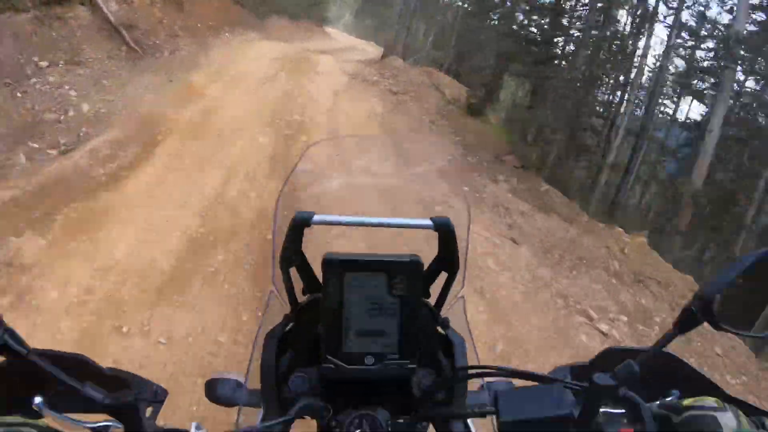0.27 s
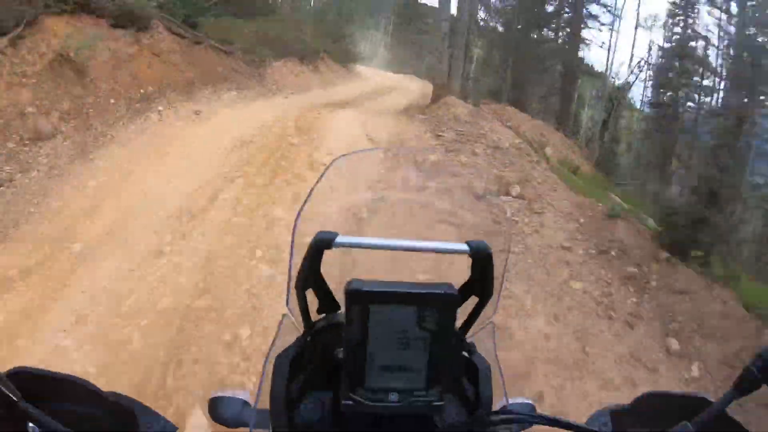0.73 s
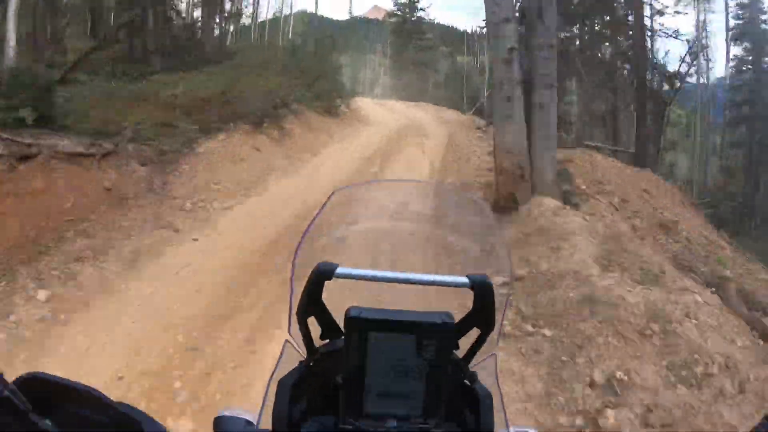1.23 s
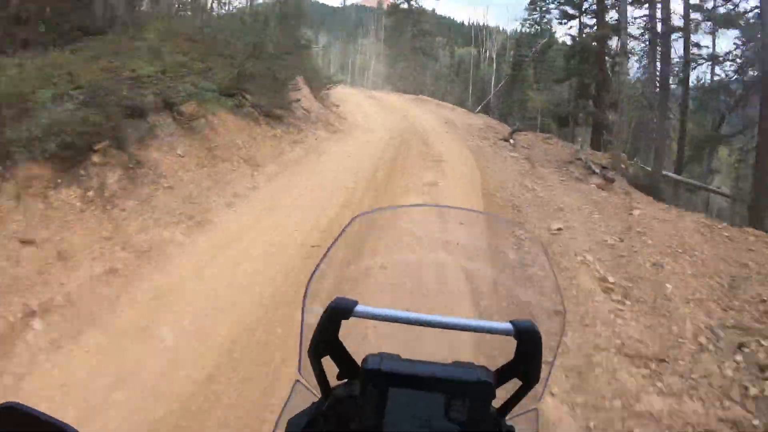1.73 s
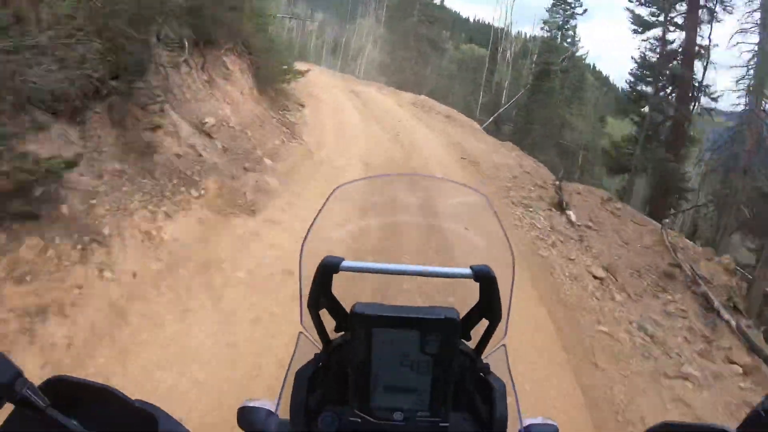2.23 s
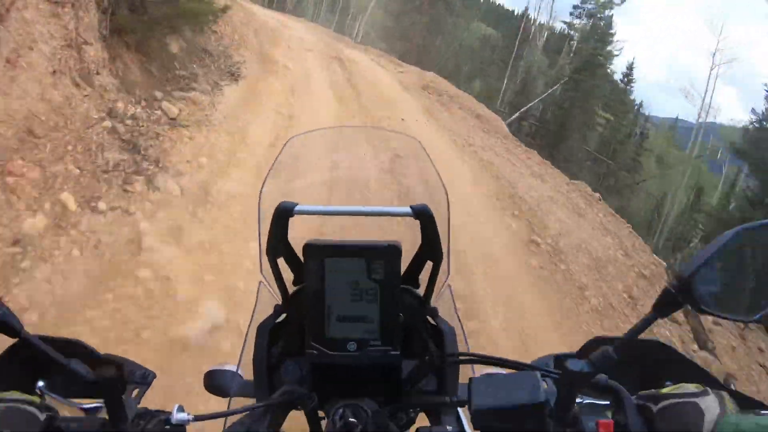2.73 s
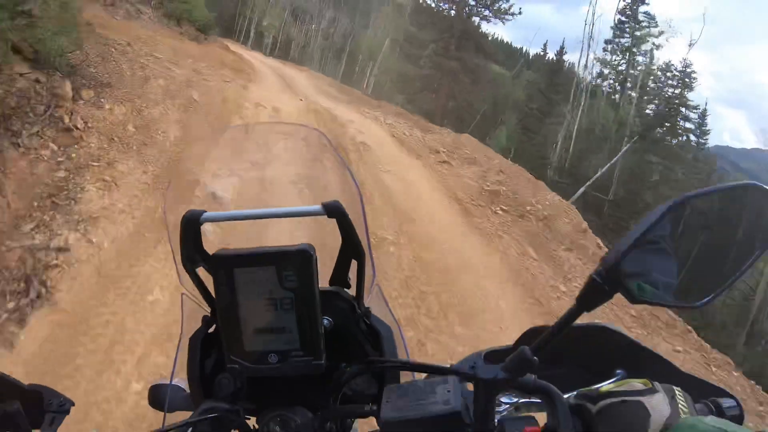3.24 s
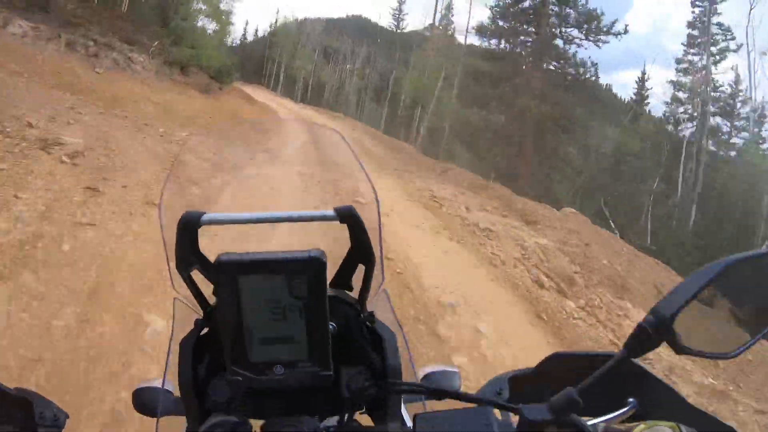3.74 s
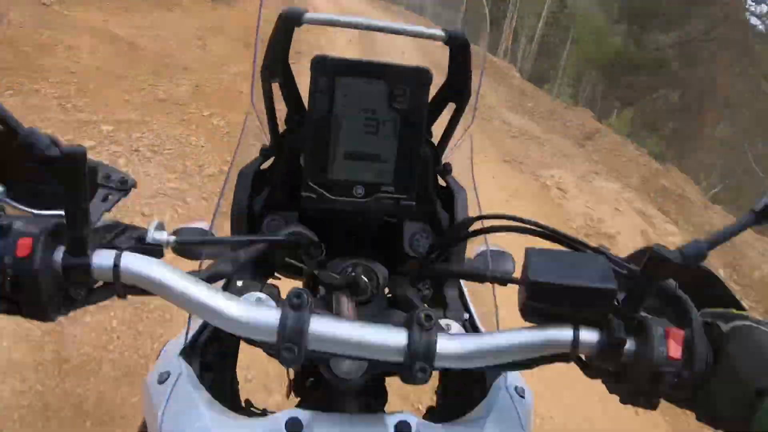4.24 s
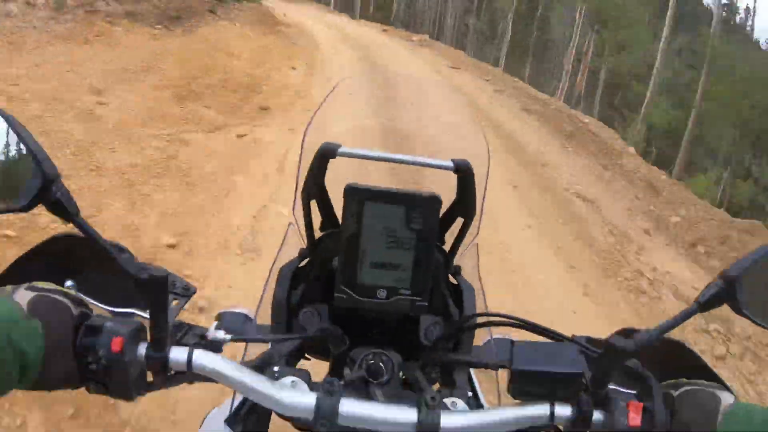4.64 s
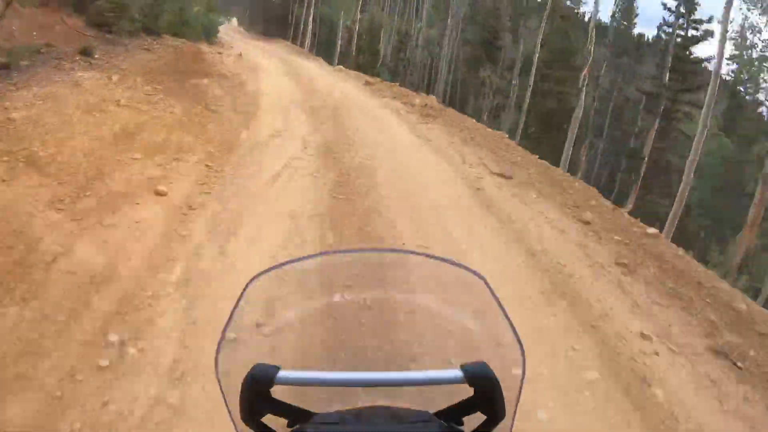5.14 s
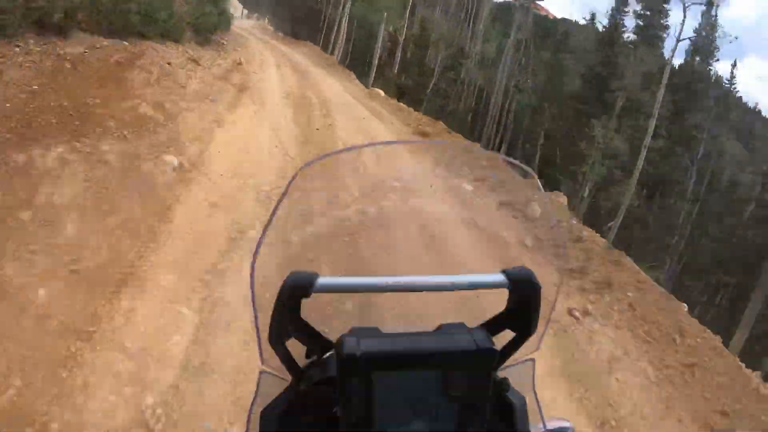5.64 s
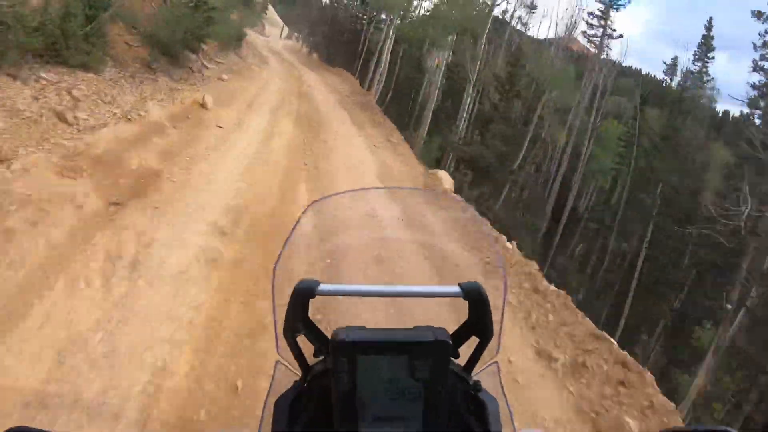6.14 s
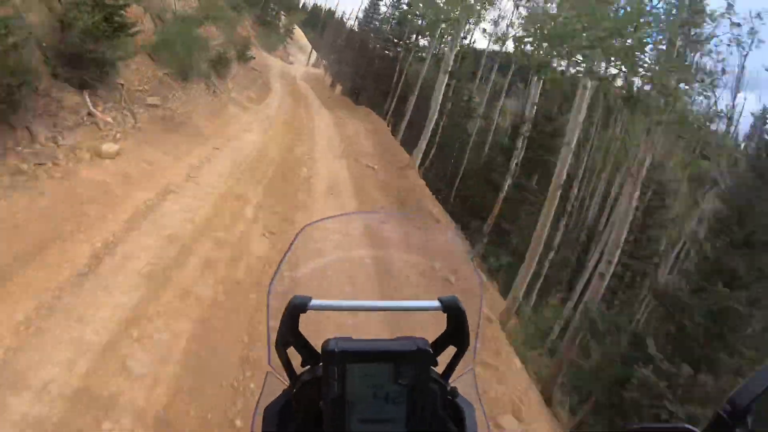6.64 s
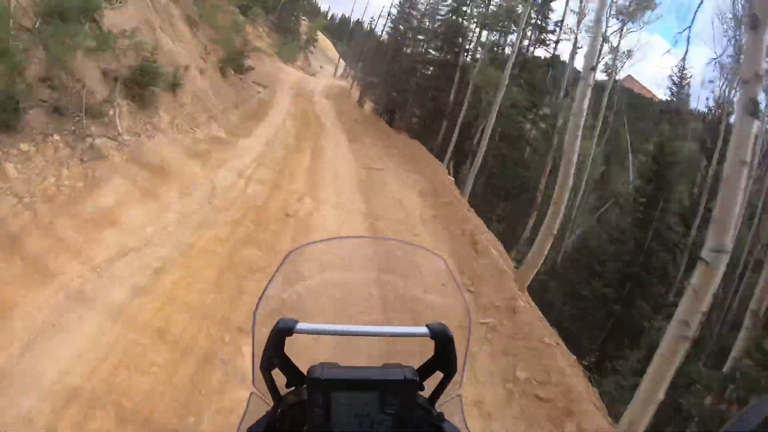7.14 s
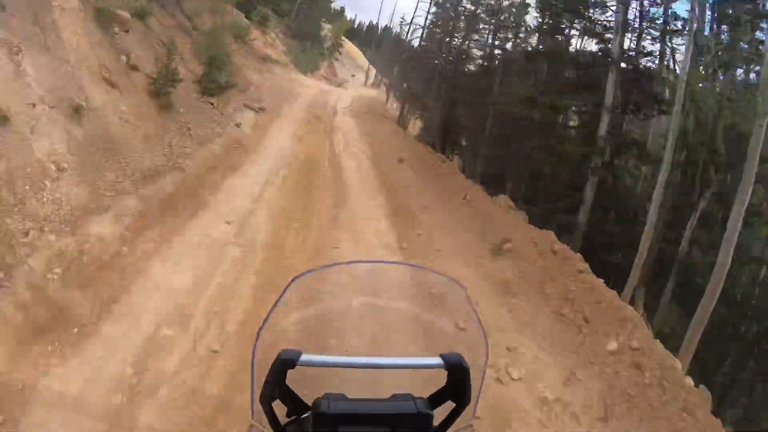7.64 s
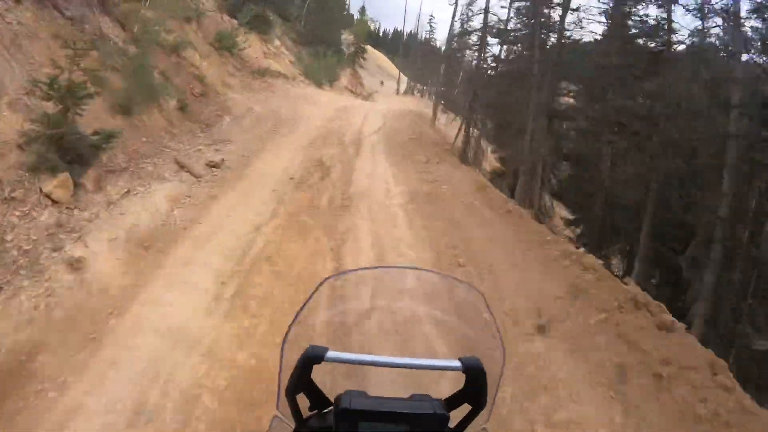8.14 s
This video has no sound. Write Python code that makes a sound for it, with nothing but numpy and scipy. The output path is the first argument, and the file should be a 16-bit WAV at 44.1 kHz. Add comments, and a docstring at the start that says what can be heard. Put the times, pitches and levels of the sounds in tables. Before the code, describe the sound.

Close on the rider's chest, a twin-cylinder motorcycle throbs and growls along a mountain gravel road. Revs flutter and flare, then ease to a softer, lower note with intake growl. Midway the engine races as the wheel slips, and a cluster of heavy thuds and knocks shakes the bike. It drops quiet, then pulls again, climbing steadily. Gravel crunches, stones tick and clank, low wind rumbles.

```python
"""A parallel-twin motorcycle climbs a gravel road, heard from the rider's chest as the throttle opens and eases.
The exhaust throbs in engine orders through a ringing silencer; intake gulps growl and whistle in the airbox.
Knocks and noise ring the crankcase and gear tones glide with the engine.
Showers of clicks make the gravel, struck resonances the stones and jolts; shaped noise makes the wind."""
import sys
import numpy as np
from scipy import signal
from scipy.fft import rfft, irfft, next_fast_len
from scipy.io import wavfile
from scipy.ndimage import uniform_filter1d, minimum_filter1d

SR = 44100
rng = np.random.default_rng(int(sys.argv[2]) if len(sys.argv) > 2 else 0)


def file_out(sig):
    """Save sig as 16-bit WAV at sys.argv[1]."""
    # one column per channel
    cols = np.atleast_2d(sig).T
    # limit, then scale
    lim = np.clip(cols, -1, 1)
    pcm = np.round(lim * 32767).astype(np.int16)
    wavfile.write(sys.argv[1], SR, pcm)


N = 369558
TIME = np.arange(N) / SR

SECOND_FIRING = 270 / 720  # share of the four-stroke cycle
LOUDEST_SPEED = 34.6  # cycles per s; above this speed the revs make the silencer and third order no louder

# Resonances of the crankcase: pitch_hz [Hz], width_hz [Hz], level_db [dB, relative]
CRANKCASE_MODES = [(1010, 50, -8), (1135, 80, 3.5), (1245, 45, -1), (1410, 60, -2), (1585, 130, 3),
                   (1860, 70, 1), (2020, 70, -2), (2370, 120, -6), (2850, 110, -3)]


def from_db(db):
    """Decibels to gain."""
    return 10 ** (np.asarray(db) / 20)


def rms_one(x):
    """Scale to unit power."""
    return x / np.sqrt(np.mean(x ** 2) + 1e-20)


def control_curve(rows):
    """Join (time, value) points by straight lines, a value at every sample."""
    times_s, values = np.transpose(rows)
    return np.interp(TIME, times_s, values)


def swing(control):
    """How far a control stands above its mean."""
    return control - control.mean()


def swell(centre_s, half_length_s):
    """A smooth rise and fall around a moment, down to 1/e at the half length."""
    return np.exp(-((TIME - centre_s) / half_length_s) ** 2)


def drift(rate_hz):
    """Slow random wandering with unit power, quicker at a higher rate."""
    step = 40  # samples between the points of the slow curve
    r = np.exp(-2 * np.pi * rate_hz * step / SR)
    chance = rng.standard_normal(N // step + 2002)
    # the first 2000 points let the filter settle
    slow = signal.lfilter([1], [1, -2 * r, r * r], chance)[2000:]
    return np.interp(np.arange(N) / step, np.arange(len(slow)), rms_one(slow))


def colour(x, spectrum):
    """Give a sound a smooth spectrum with falling skirts; unit power."""
    hz, db = np.transpose(spectrum)
    size = next_fast_len(N + SR // 2)
    bins = np.maximum(np.fft.rfftfreq(size, 1 / SR), 1)
    gain = from_db(np.interp(np.log(bins), np.log(hz), db))
    low_skirt = np.minimum(1, bins / hz[0]) ** 2
    high_skirt = np.minimum(1, hz[-1] / bins) ** 2
    return rms_one(irfft(rfft(x, size) * gain * low_skirt * high_skirt, size)[:N])


def cut(x, hz, kind, order=2):
    """Low- or high-pass."""
    return signal.sosfilt(signal.butter(order, hz, kind, fs=SR, output="sos"), x + 1e-18)


def resonate(x, modes):
    """Parallel resonances of alternating sign; a narrower width rings longer."""
    out = 0
    for k, (hz, width_hz, db) in enumerate(modes):
        r = np.exp(-np.pi * width_hz / SR)
        poles = [1, -2 * r * np.cos(2 * np.pi * hz / SR), r * r]
        gain = (-1) ** k * from_db(db) * (1 - r * r) / 2
        out = out + gain * signal.lfilter([1, 0, -1], poles, x + 1e-18)
    return out


def peak_one(modes):
    """Gain that makes a unit click ring with height 1."""
    return 1 / np.abs(resonate(signal.unit_impulse(SR // 20), modes)).max()


def duct(x, trips_s, reflection):
    """Waves bounce along the ducts, so that each pulse is drawn out but keeps its spectrum."""
    size = next_fast_len(N + SR // 2)
    spectrum = rfft(x, size)
    for trip_s in trips_s:
        delay = np.exp(-2j * np.pi * trip_s * np.fft.rfftfreq(size, 1 / SR))
        spectrum = spectrum * (delay - reflection) / (1 - reflection * delay)
    return irfft(spectrum, size)[:N]


def strokes(cycles, second_db, rough_db, jitter_s):
    """One pulse per cylinder and cycle, with random spread of strength and timing."""
    out = np.zeros(N)
    count = np.arange(int(cycles[-1]))
    for offset, db in ((0, 0), (SECOND_FIRING, second_db)):
        timing, strength = rng.standard_normal((2, len(count)))
        at = (np.interp(count + offset, cycles, TIME) + jitter_s * timing) * SR
        out[np.clip(at.astype(int), 0, N - 1)] = from_db(db + rough_db * strength)
    return out


def puffs(pulses, decay_s):
    """Each pulse lets out a short burst of noise."""
    envelope = signal.lfilter([1], [1, -np.exp(-1 / (decay_s * SR))], pulses + 1e-18)
    return envelope * rng.standard_normal(N)


def grains(per_s, spread_db):
    """Random clicks of either sign; a wider spread makes a few of them larger."""
    sizes = from_db(spread_db * np.minimum(rng.exponential(1, N), 5)) * rng.choice([-1, 1], N)
    return sizes * (rng.random(N) < per_s / SR)


def blows(times_s, levels_db):
    """A click at each time."""
    out = np.zeros(N)
    out[(np.asarray(times_s) * SR).astype(int)] = from_db(levels_db)
    return out


def engine(speed, load_db, intake_db, rattle_db):
    """Speed sets the pitch of every part; speed and load drive the silencer, and the gears follow the clatter."""
    # the rough road tugs at the crank
    cycles = np.cumsum(speed * (1 + .003 * drift(14))) / SR
    revs = swing(np.minimum(speed, LOUDEST_SPEED))
    # the silencer answers to the load averaged over 0.25 s
    pull_db = uniform_filter1d(swing(load_db), int(.25 * SR))
    silencer_db = -37.5 + .5 * pull_db + 1.67 * revs
    # a floor keeps the silencer humming on a shut throttle
    silencer_db = np.maximum(silencer_db, -41) + drift(12)
    exhaust = exhaust_throb(cycles, speed, load_db, intake_db) + silencer(cycles, silencer_db)
    intake = airbox(cycles, speed, intake_db) + whistle(cycles)
    return exhaust + intake + clatter(cycles, rattle_db) + gears(cycles, rattle_db - 11)


def exhaust_throb(cycles, speed, load_db, intake_db):
    """The lowest engine orders leave the tailpipe as nearly pure tones; the third yields to load and intake."""
    # Set moments when an order booms on a resonance of the pipes:
    # centre_s [s], order [multiple of the cycle rate], half_length_s [s], level_db [dB]
    boom_moments = [(0.497, 6, 0.016, -15.5), (1.306, 9, 0.059, -26), (1.632, 6, 0.075, -20),
                    (2.004, 9, 0.18, -34), (1.754, 3, 0.36, -34), (2.348, 3, 0.24, -22.5),
                    (2.675, 8, 0.21, -30), (3.437, 5, 0.17, -24.5), (3.466, 6, 0.18, -24.5),
                    (4.153, 6, 0.046, -27), (4.33, 5, 0.12, -23), (4.28, 8, 0.037, -26),
                    (4.38, 14, 0.044, -31), (4.905, 16, 0.052, -46), (4.93, 3, 0.093, -37),
                    (5.17, 10, 0.073, -32), (5.2, 12, 0.091, -38), (5.24, 9, 0.064, -46),
                    (6.052, 6, 0.099, -20.5), (6.864, 6, 0.15, -33), (7.182, 6, 0.1, -22.5),
                    (7.8, 6, 0.26, -28), (8.245, 6, 0.14, -26.5)]
    first_db = -47.5 + .74 * swing(load_db)
    revs_db = 2.2 * swing(np.minimum(speed, LOUDEST_SPEED))  # dB per cycle per s
    third_db = -33 + revs_db - .17 * swing(intake_db) - .044 * swing(load_db)
    sixth_db = -38 + .11 * swing(intake_db)
    out = np.zeros(N)
    for order, db in ((1, first_db), (2, load_db), (3, third_db), (6, sixth_db)):
        out += from_db(db + .5 * drift(19)) * np.cos(2 * np.pi * order * cycles)
    for centre_s, order, half_length_s, db in boom_moments:
        out += from_db(db) * swell(centre_s, half_length_s) * np.cos(2 * np.pi * order * cycles)
    return np.sqrt(2) * out


def silencer(cycles, level_db):
    """Both firings ring the silencer, with a little gas noise; its overtones glide together with the engine."""
    # Resonances: pitch_hz [Hz], width_hz [Hz], level_db [dB, relative]
    silencer_modes = [(292, 8.7, -8), (420, 18, 0), (480.7, 24.6, 13.5), (659, 14, -6.5), (1050, 120, -17)]
    # Tailpipe overtones: order [multiple of the cycle rate], level_db [dB, relative to the silencer]
    overtone_levels = [(8, -7), (9, -8), (11, -9), (12, -11), (13, -5), (16, -17), (17, -16), (18, -17)]
    pulses = strokes(cycles, second_db=-1.5, rough_db=.9, jitter_s=.00005)
    gas = rms_one(pulses) + .1 * rms_one(puffs(pulses, decay_s=.008))
    ringing = cut(resonate(gas, silencer_modes), 353, "high", order=4)
    ringing = cut(ringing, 1400, "low", order=4)
    ringing = rms_one(duct(ringing, trips_s=[.0058], reflection=.63))
    overtones = np.zeros(N)
    for order, db in overtone_levels:
        phase = 2 * np.pi * order * cycles + drift(.5)
        overtones += from_db(db + .8 * drift(3)) * np.sin(phase)
    return from_db(level_db) * (ringing + np.sqrt(2) * overtones)


def airbox(cycles, speed, level_db):
    """Intake gulps boom in the airbox, one throat louder; turbulence roughens them as the revs rise."""
    # Resonances: pitch_hz [Hz], width_hz [Hz], level_db [dB, relative]
    airbox_modes = [(153, 17, -22), (262.8, 59.3, 7), (337, 114, 3), (458.7, 33, 0), (566, 69, -12.5),
                    (1012, 12, -13)]
    pulses = strokes(cycles, second_db=-10, rough_db=.8, jitter_s=.00005)
    # share at mean speed .24, growing 1.3 dB per cycle per s
    turbulence = np.minimum(.24 * from_db(1.3 * swing(speed)), 1)
    air = rms_one(pulses) + turbulence * rms_one(puffs(pulses, decay_s=.069))
    air = air / np.hypot(1, turbulence)
    ringing = cut(resonate(air, airbox_modes), 158, "high", order=6)
    ringing = cut(ringing, 1400, "low", order=4)
    return from_db(level_db) * rms_one(duct(ringing, trips_s=[.0073, .0112], reflection=.54))


def whistle(cycles):
    """Air drawn past the throttle plates sings in the throats with every gulp."""
    # Resonances of the intake throats: pitch_hz [Hz], width_hz [Hz], level_db [dB, relative]
    throat_modes = [(994, 53, 2), (1484, 55, -2), (2432, 100, 2)]
    # Whistle, strongest with the throttle held open at low speed: time_s [s], level_db [dB]
    whistle_levels = [(2.3, -47), (2.6, -38.5), (3.55, -41), (3.9, -42), (5.0, -46.5)]
    gulps = strokes(cycles, second_db=-4, rough_db=1, jitter_s=0)
    drawn_out = rms_one(duct(gulps, trips_s=[.0037, .0061], reflection=.6))
    air = .6 * rms_one(puffs(gulps, decay_s=.01)) + drawn_out
    singing = rms_one(cut(resonate(air, throat_modes), 3500, "low", order=4))
    return from_db(control_curve(whistle_levels)) * singing


def clatter(cycles, level_db):
    """Valves and pistons rattle on every turn of the crank and ring the crankcase; the taps keep strict time."""
    # Spectrum of the rattle: pitch_hz [Hz], level_db [dB per Hz, relative]
    clatter_spectrum = [(350, -39), (620, 13), (760, 2), (930, -2.5), (1160, 5.5), (1330, 2.5), (1600, 3),
                        (1950, 2.5), (2250, -16), (3500, -25.5)]
    knocks = strokes(cycles, second_db=-1.5, rough_db=1.8, jitter_s=.0005)
    crank = 1 + .2 * np.cos(4 * np.pi * cycles)  # two turns per cycle
    rattle = .54 * rms_one(puffs(knocks, decay_s=.006)) + crank * rng.standard_normal(N)
    taps = strokes(cycles, second_db=-1.5, rough_db=1, jitter_s=0)
    taps = duct(taps, trips_s=[.0013, .0031, .0052, .0083], reflection=.6)
    drive = rms_one(taps) + .3 * rms_one(puffs(knocks, decay_s=.008))
    casing = np.zeros(N)
    for k, mode in enumerate(CRANKCASE_MODES):
        flutter = from_db(3.5 * drift(9.3))  # each mode swells and fades by itself
        casing += (-1) ** k * flutter * resonate(drive, [mode])
    casing = rms_one(cut(casing, 4000, "low", order=4))
    mix = from_db(-5.5) * colour(rattle, clatter_spectrum) + from_db(-8) * casing
    return from_db(level_db + .5 * drift(9.6)) * mix


def gears(cycles, level_db):
    """Unsteady gear tones glide with the engine, swelling across crankcase modes; a few sing out with a rasp."""
    # Wavering whine that lasts throughout: multiple [of the cycle rate], level_db [dB, relative]
    gear_tones = [(30, -5), (33.5, -5), (36, -3), (43, -3), (48.4, 3), (50, 1), (53, -3), (66, -1),
                  (76, -1), (80, -1), (89, 0)]
    # Tones that sing out: centre_s [s], multiple [of the cycle rate], half_length_s [s], level_db [dB]
    gear_flares = [(0.33, 47, 0.079, -34), (0.303, 35, .2, -41), (1.75, 29.4, 0.055, -36),
                   (1.673, 49, 0.15, -34.5), (2.95, 50, 0.25, -41), (3.1, 81, 0.41, -48),
                   (3.222, 34, 0.24, -43), (3.558, 33, .15, -45), (5.624, 31, 0.12, -36),
                   (5.62, 35.5, .06, -34), (5.634, 18, 0.054, -31), (5.56, 50.4, 0.12, -39),
                   (6.06, 50, 0.072, -35), (6.3, 66.5, 0.19, -47), (6.417, 44, .1, -39.5),
                   (6.46, 50, 0.07, -41), (6.58, 66, .12, -37), (6.82, 78, .12, -51.5),
                   (6.97, 81, 0.16, -39), (7.65, 50.4, .08, -43), (7.76, 42, 0.17, -34.5),
                   (8.008, 48.3, 0.15, -33.5)]

    def tone(multiple):
        phase = 2 * np.pi * multiple * cycles + .9 * drift(20)
        return from_db(3 * drift(14)) * np.sin(phase)

    mesh = sum(from_db(db) * tone(multiple) for multiple, db in gear_tones)
    flares = np.zeros(N)
    for centre_s, multiple, half_length_s, db in gear_flares:
        flares += from_db(db) * swell(centre_s, half_length_s) * tone(multiple)
    rasp = 1 + .4 * np.cos(2 * np.pi * cycles)  # each engine cycle chops the flares
    return from_db(level_db) * rms_one(resonate(mesh, CRANKCASE_MODES)) + rasp * flares


def tyres(gravel_db):
    """Stones grind under the tread in clumps and handfuls, and fine grit sprays off it."""
    # Spectra of the crunch and the grit: pitch_hz [Hz], level_db [dB per Hz, relative]
    crunch_spectrum = [(700, -3.5), (1600, 2), (2300, 3.5), (2650, -2), (2850, 2.5), (3050, -1), (3400, -3),
                       (4200, -23.5), (6000, -33.5)]
    grit_spectrum = [(2500, 6.5), (3800, 6.5), (4950, 4.5), (5900, -5.5), (8200, -5), (9300, -11.5),
                     (10200, -18), (11000, -26.5), (15000, -52.5)]
    # Handfuls of gravel thrown by the tyres: centre_s [s], half_length_s [s], added_db [dB]
    gravel_sprays = [(0.558, 0.018, 4.5), (1.268, 0.017, -0.5), (4.114, .01, 7.5), (4.547, 0.28, 3),
                     (7.486, 0.034, 4)]
    crunch = colour(grains(8000 * from_db(2.6 * drift(15)), spread_db=0), crunch_spectrum)
    grit = colour(grains(12000 * from_db(1.9 * drift(29)), spread_db=1.5), grit_spectrum)
    crunch_db = -37 + swing(gravel_db)
    for centre_s, half_length_s, added_db in gravel_sprays:
        crunch_db = crunch_db + added_db * swell(centre_s, half_length_s)
    return from_db(.61 * drift(30)) * (from_db(crunch_db) * crunch + from_db(gravel_db) * grit)


def bodywork(x):
    """Close reflections colour the treble with a fine ripple; the power stays the same."""
    # Echoes off the windscreen, tank and rider: delay_s [s], share [signed gain]
    close_echoes = [(.0023, .1), (.0041, -.12), (.0067, .12)]
    echoed = x + sum(share * np.interp(TIME - delay_s, TIME, x, left=0) for delay_s, share in close_echoes)
    return echoed * x.std() / echoed.std()


def stones():
    """Single stones skitter against the metal guard and make a panel clank."""
    # Stones flung against the bike: start_s [s], tick_db and clank_db [dB, strength of the blow]
    stone_hits = [(0.849, -33, -23.5), (1.74, -31, -31), (1.784, -36, -22), (2.2109, -38, -31),
                  (2.6313, -31, -40), (2.685, -48, -27), (3.2186, -42, -40), (4.2817, -45, -41),
                  (4.3196, -51, -44), (4.617, -51, -30), (4.69, -32, -21.5), (5.242, -31, -22)]
    # Resonances of guard and panel: pitch_hz [Hz], width_hz [Hz], level_db [dB, relative]
    guard_modes = [(3130, 500, 0), (4840, 470, 19.5), (6600, 970, 16), (8200, 900, -7)]
    panel_modes = [(1587, 22, 7), (1810, 88, 0.5)]
    start_s, tick_db, clank_db = np.transpose(stone_hits)
    hits = blows(start_s, tick_db)
    skitter = .1 * hits + .09 * puffs(hits, decay_s=.012)
    tick = peak_one(guard_modes) * resonate(skitter, guard_modes)
    clanks = blows(start_s, clank_db)
    clanks = clanks + .039 * puffs(clanks, decay_s=.01)
    clank = peak_one(panel_modes) * resonate(clanks, panel_modes)
    return cut(tick, 9000, "low", order=4) + cut(clank, 3000, "low")


def jolts():
    """Bumps thud through the mount and set it juddering; the housing knocks and rattles, some knocks brighter."""
    # Jolts: start_s [s], thud_db [dB, strength of the bump], knock_db [dB, peak], top_hz [Hz, knock low-pass]
    jolt_events = [(0.531, -12, -18, 2000), (2.336, -11, -45, 800), (2.43, -11, -46, 800),
                   (2.558, -7, -46, 800), (2.684, -7.5, -42, 800), (4.039, -10, -13, 1600),
                   (4.09, -9.5, -17, 1800), (4.123, -8, -24, 1500), (4.148, -5, -30, 900),
                   (4.195, -9, -25, 1500), (4.41, -15, -29, 900), (4.449, -1.5, -10, 2200),
                   (4.492, -9.5, -13, 1100), (4.506, -2.5, -14, 1300), (4.523, -5.5, -19, 800),
                   (4.532, -14, -18, 1200), (4.54, -18, -12, 2400), (4.561, -9, -17, 900),
                   (4.588, -6, -24, 900), (4.6, -10, -28, 800), (4.622, -5.5, -15, 2000),
                   (4.632, -9, -18, 1200), (4.646, -3, -24, 1200), (4.663, -6, -24, 600),
                   (4.683, -7, -29, 600), (4.734, -5, -30, 600), (4.748, -23, -31, 700),
                   (4.779, -10, -38, 600)]
    # Resonances of mount and housing: pitch_hz [Hz], width_hz [Hz], level_db [dB, relative]
    mount_modes = [(43, 8.8, 4), (71.8, 14.6, 8), (124, 67, 5.5), (245, 53, -3), (345, 81, -11.5)]
    housing_modes = [(378, 330, 4), (727, 390, 4.5), (1160, 210, 1)]
    start_s, thud_db, _, _ = np.transpose(jolt_events)
    bumps = blows(start_s, thud_db)
    bumps = bumps + .012 * puffs(bumps, decay_s=.012)
    out = peak_one(mount_modes) * cut(resonate(bumps, mount_modes), 346, "low")
    size = SR // 10
    for at_s, _, knock_db, top_hz in jolt_events:
        rattle = np.exp(-TIME[:size] / .007) * rng.standard_normal(size)
        contact = signal.unit_impulse(size) + .09 * rattle
        knock = cut(resonate(contact, housing_modes), top_hz, "low", order=3)
        start = int(at_s * SR)
        out[start:start + size] += from_db(knock_db) * knock / np.abs(knock).max()
    return out


def wind(gravel_db, rumble_db):
    """Lumpy eddies on the microphone: a gusting rumble, and buffets that rise and ease with the gravel."""
    # Spectra of the rumble and the buffets: pitch_hz [Hz], level_db [dB per Hz, relative]
    rumble_spectrum = [(12, 6.5), (25, 0), (40, 1), (60, 1), (100, -5), (250, -48)]
    buffet_spectrum = [(30, -27.5), (60, -9), (110, -4), (200, -10), (350, -10.5), (550, -21.5), (800, -36),
                       (1500, -50)]
    gusts_db = 1.5 * drift(3.3)
    rumble = from_db(rumble_db + 2.5 + gusts_db) * colour(rng.standard_normal(N), rumble_spectrum)
    buffet_db = -26 + 1.14 * swing(gravel_db) + .28 * drift(29)
    return rumble + from_db(buffet_db) * colour(rng.standard_normal(N), buffet_spectrum)


def scene():
    """Engine, road and wind at the rider's chest."""
    # Engine speed, flaring where the rear wheel slips: time_s [s], speed [four-stroke cycles per s]
    speed = control_curve([(0.0, 31.3), (0.07, 31.0), (0.14, 28.8), (0.26, 32.8), (0.39, 31.2),
                           (0.47, 38.4), (0.49, 39.0), (0.54, 36.5), (0.59, 36.1), (0.64, 31.9),
                           (0.66, 31.1), (0.79, 31.0), (0.87, 35.0), (0.92, 35.7), (0.97, 35.0),
                           (1.01, 31.5), (1.11, 33.4), (1.15, 31.6), (1.22, 32.2), (1.31, 29.8),
                           (1.39, 31.2), (1.47, 35.6), (1.53, 34.8), (1.62, 39.2), (1.72, 36.6),
                           (1.78, 38.5), (1.82, 35.3), (1.93, 31.4), (2.0, 33.0), (2.11, 30.9),
                           (2.23, 32.0), (2.27, 29.2), (2.37, 28.0), (2.48, 28.1), (2.64, 30.7),
                           (2.73, 28.9), (2.87, 30.5), (3.21, 28.6), (3.5, 30.7), (3.62, 29.3),
                           (3.76, 32.1), (3.9, 32.2), (4.02, 30.6), (4.14, 35.2), (4.22, 43.5),
                           (4.32, 48.8), (4.42, 47.6), (4.52, 39.0), (4.7, 30.3), (4.82, 32.3), (4.9, 31.2),
                           (5.02, 28.9), (5.11, 31.0), (5.2, 32.4), (5.28, 30.7), (5.3, 31.3), (5.35, 35.2),
                           (5.41, 34.5), (5.64, 37.9), (5.69, 33.9), (5.75, 33.0), (5.87, 34.7),
                           (5.91, 37.3), (6.04, 39.2), (6.09, 37.6), (6.14, 38.4), (6.19, 34.6),
                           (6.35, 34.5), (6.41, 37.6), (6.55, 34.6), (6.73, 38.5), (6.84, 36.0),
                           (6.98, 34.9), (7.18, 37.6), (7.35, 36.1), (7.48, 39.6), (7.54, 37.5),
                           (7.6, 40.3), (7.71, 37.5), (7.77, 38.7), (8.04, 38.7), (8.1, 36.1), (8.19, 39.9),
                           (8.28, 38.2), (8.38, 40.1)])
    # Load, as the throb of the second engine order: time_s [s], level_db [dB]
    load_db = control_curve([(0.0, -16.5), (1.1, -20.5), (1.94, -15.5), (2.24, -42.5), (2.38, -23.5),
                             (2.72, -37.5), (2.92, -21.5), (3.02, -31), (3.86, -14.5), (4.15, -18.5),
                             (4.3, -29.5), (4.6, -30), (4.8, -40), (4.961, -39.5), (5.279, -26),
                             (5.45, -15.5), (6.6, -15), (7.27, -18.5), (7.45, -15), (7.68, -19),
                             (8.38, -15)])
    # Air drawn through the throttle, as the growl of the airbox: time_s [s], level_db [dB]
    intake_db = control_curve([(0.0, -19), (0.52, -16), (0.6, -32.5), (0.88, -20.5), (1.66, -21),
                               (1.86, -26), (2.358, -34.5), (3.281, -15), (4.05, -20.5), (4.251, -27.5),
                               (4.68, -22), (4.72, -50.5), (4.96, -50), (5.14, -30), (5.76, -32),
                               (5.859, -22), (7.24, -41), (7.4, -28.5), (7.941, -40.5), (8.38, -25)])
    # Mechanical clatter, ahead of the trims of its parts: time_s [s], level_db [dB]
    rattle_db = control_curve([(0.0, -31.5), (1.06, -30.5), (1.36, -35), (1.78, -26), (1.92, -32.5),
                               (2.34, -41.5), (2.86, -40.5), (4.159, -33), (4.24, -26.5), (4.7, -47),
                               (4.76, -45.5), (5.08, -40.5), (5.22, -31), (5.56, -27), (6.3, -31),
                               (6.72, -29.5), (7.0, -32.5), (8.38, -26.5)])
    # How hard the tyres work the gravel, as the hiss of grit: time_s [s], level_db [dB]
    gravel_db = control_curve([(0.0, -43), (0.16, -46), (0.49, -42.5), (0.65, -46), (1.8, -41.5),
                               (1.87, -46.5), (2.47, -49), (2.71, -45.5), (3.55, -46), (3.76, -41.5),
                               (4.04, -45.5), (4.34, -40.5), (4.95, -54), (5.41, -46), (8.38, -44.5)])
    # Wind rumble, ahead of its trim and gusts: time_s [s], level_db [dB]
    rumble_db = control_curve([(0.0, -24), (0.56, -23.5), (0.8, -30), (1.8, -28), (2.62, -28.5),
                               (3.28, -33.5), (3.96, -21), (4.82, -32), (5.1, -36), (5.6, -27), (7.24, -26),
                               (8.38, -27)])
    road = bodywork(tyres(gravel_db)) + stones() + jolts()
    mix = engine(speed, load_db, intake_db, rattle_db) + road + wind(gravel_db, rumble_db)
    return mix[None]


def record(dry):
    """A fast limiter holds the peaks down; the ends are eased and the top is cut."""
    ceiling, size = .67, SR // 150
    gain = np.minimum(1, ceiling / (np.abs(dry) + 1e-9))
    gain = minimum_filter1d(gain, 2 * size)
    gain = uniform_filter1d(uniform_filter1d(gain, size), size)
    ends = np.minimum(1, np.minimum(TIME, TIME[::-1]) / .003)
    top_cut = signal.cheby2(12, 70, 15700, fs=SR, output="sos")  # 70 dB down from 15.7 kHz
    return signal.sosfilt(top_cut, dry * gain * ends)


dry = scene()
out = record(dry)
file_out(out)
```